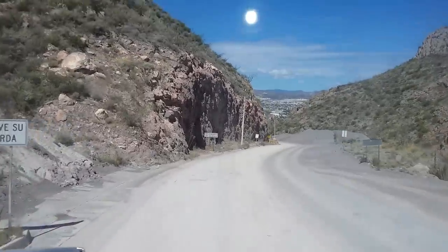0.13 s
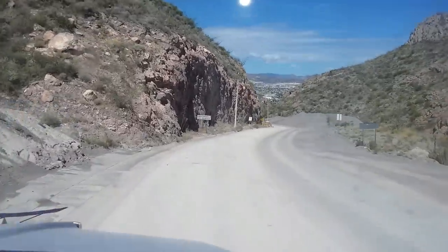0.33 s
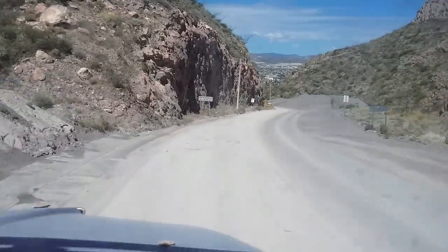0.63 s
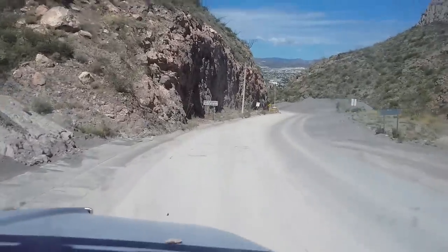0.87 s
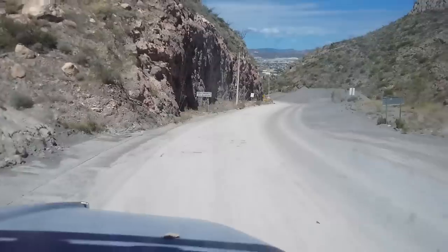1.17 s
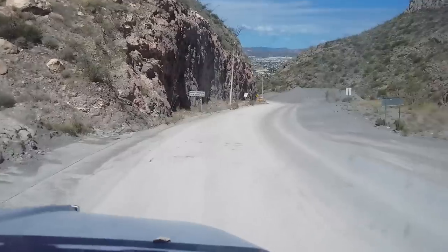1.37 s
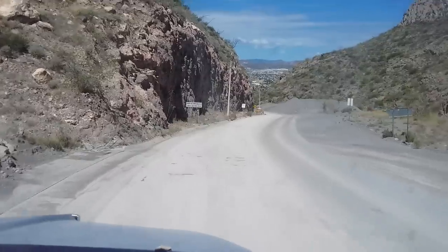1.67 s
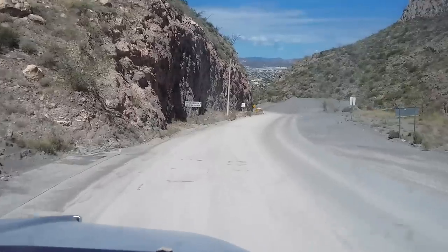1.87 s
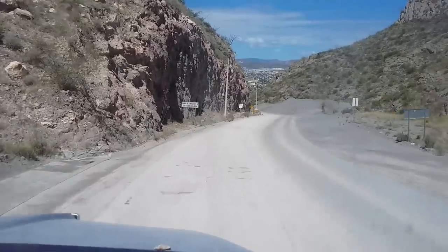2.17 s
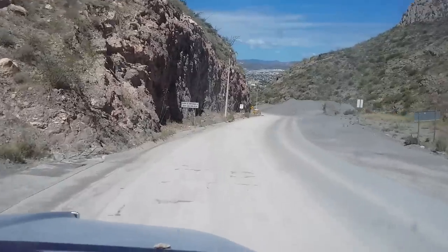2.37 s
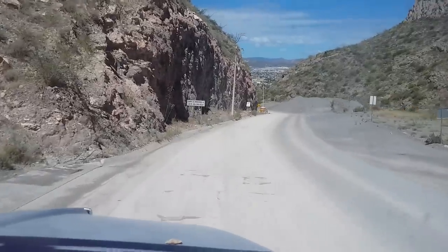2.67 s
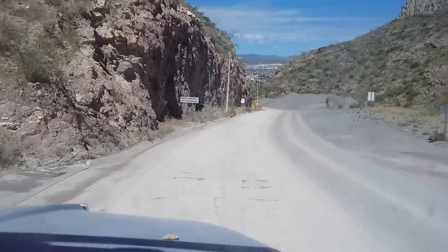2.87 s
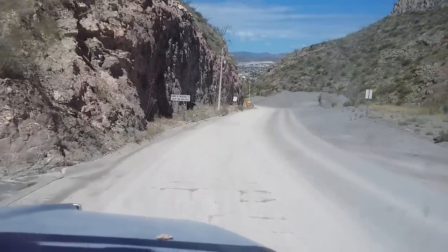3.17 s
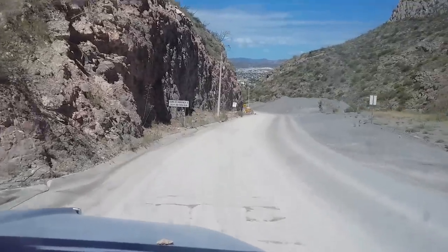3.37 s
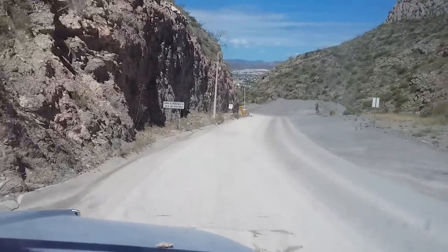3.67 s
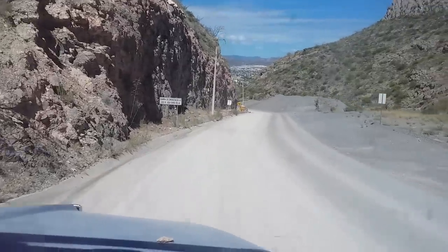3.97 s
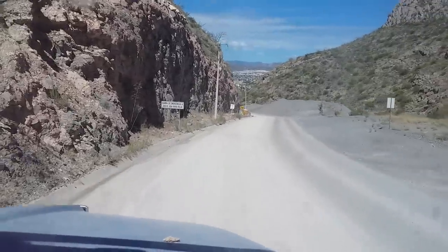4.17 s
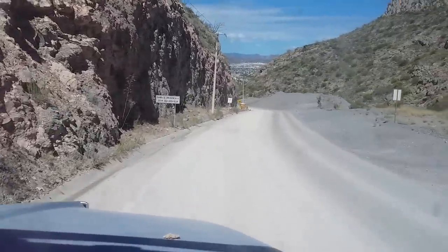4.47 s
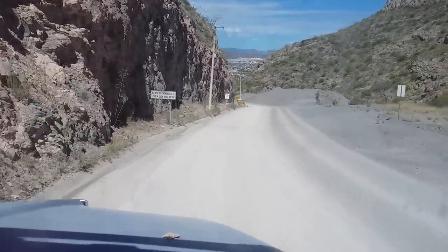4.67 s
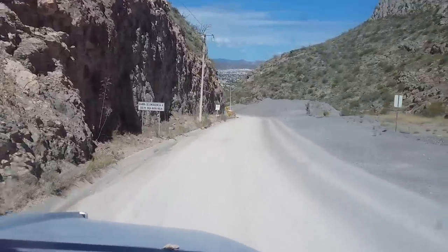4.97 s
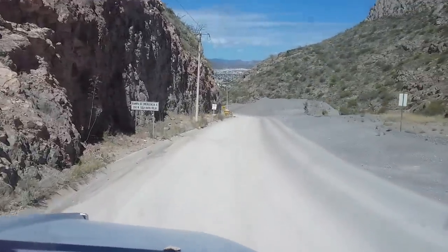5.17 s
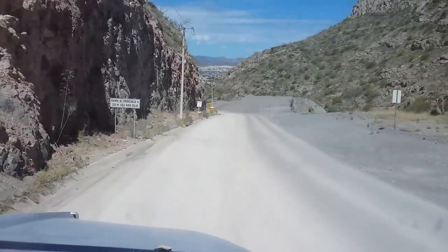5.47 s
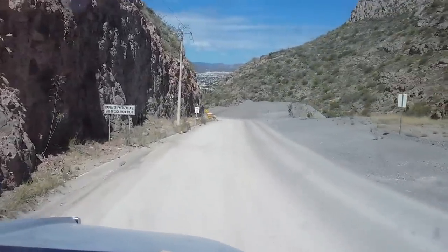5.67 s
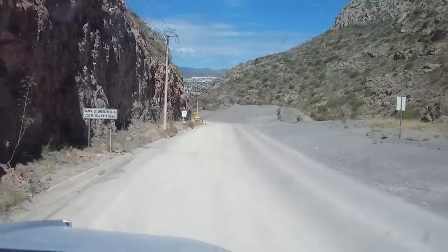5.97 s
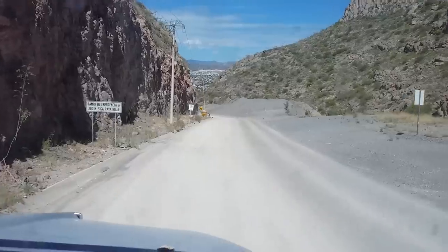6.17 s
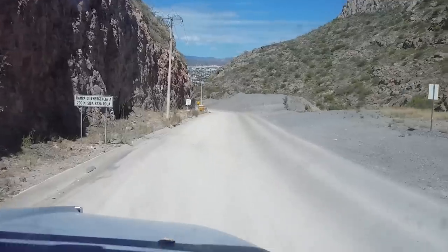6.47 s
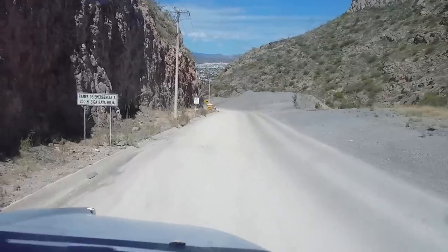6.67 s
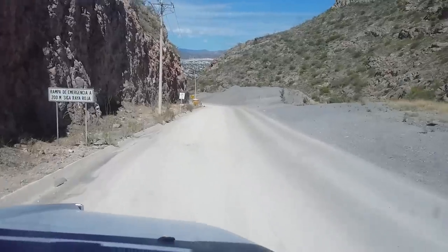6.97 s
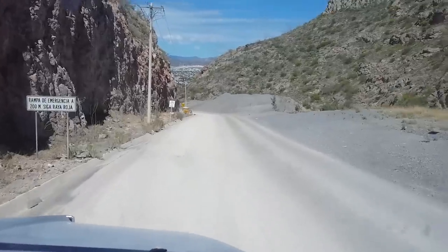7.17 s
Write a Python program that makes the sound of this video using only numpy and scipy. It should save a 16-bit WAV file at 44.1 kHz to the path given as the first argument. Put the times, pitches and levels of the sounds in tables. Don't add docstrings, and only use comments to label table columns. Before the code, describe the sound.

Heard from inside a heavy diesel truck's cab, the engine brake roars continuously: a deep, lumpy, rapid-fire bark with a raspy metallic edge. Pitch sags slightly within the first half second, climbs by about one second, then holds with small wavers. A loose part slaps early on. Valve clatter, gas hiss and buzzing trim sit beneath, over road rumble. Close, dense mono sound with little deep bass.

```python
import sys
import numpy as np
from scipy import signal
from scipy.fft import rfft, irfft, next_fast_len
from scipy.io import wavfile
from scipy.ndimage import uniform_filter1d, minimum_filter1d, map_coordinates

SR = 44100
rng = np.random.default_rng(int(sys.argv[2]) if len(sys.argv) > 2 else 0)


def elevation(decibels):
    levels = np.asarray(decibels, float)
    return 10 ** (levels / 20)


def waveform_to_disk(signal):
    frames = np.transpose(np.atleast_2d(signal))
    scaled = np.clip(frames, -1, 1) * 32767
    samples = np.round(scaled).astype(np.int16)
    wavfile.write(sys.argv[1], SR, samples)


N = 322371

CRUISE_RPM = 2000
CROSS_HZ = 893


def unit(x):
    return x / np.sqrt(np.mean(x ** 2) + 1e-20)


def filtered(x, response):
    m = next_fast_len(N + SR // 2)
    hz = np.fft.rfftfreq(m, 1 / SR)
    return irfft(rfft(x, m) * response(hz), m)[..., :N]


def coloured(x, points):
    f, db = np.transpose(points)
    return filtered(x, lambda hz: elevation(np.interp(np.log(hz + 1), np.log(f), db)))


def lag(hz, ms):
    return np.exp(-2j * np.pi * hz * ms / 1000)


def modes(table, f):
    return sum(g * 1j * f * w / (c * c - f * f + 1j * f * w) for c, w, g in table)


def ringing(x, rings):
    return filtered(x, lambda f: elevation(sum(db / (1 + (2 * (f - c) / w) ** 2) for c, w, db in rings)))


def noise():
    return rng.standard_normal(N)


def wobble(rate_hz):
    knots = rng.standard_normal(int(N * rate_hz / SR) + 4)
    return map_coordinates(knots, [np.arange(N) * rate_hz / SR])


# time in seconds, speed in rpm.
SPEED_TURNS = [(0.085, 1954.3), (0.475, 1832.2), (1.141, 2020.8), (1.509, 1997.6), (1.919, 2059.7),
               (2.283, 2003.7), (2.6, 2022.5), (3.031, 1986.2), (3.46, 1997.8), (3.888, 1969.8),
               (4.3, 1993.8), (4.657, 1987.6), (5.39, 2044.4), (5.951, 2058.0), (6.191, 2050.7),
               (6.607, 2017.0), (6.974, 2028.8), (7.196, 2017.3)]


def engine_rpm():
    s, rpm = np.transpose(SPEED_TURNS)
    rows = np.arange(len(s))
    place = np.interp(np.arange(N) / SR, s, rows)
    eased = np.floor(place) + np.sin(np.pi / 2 * (place % 1)) ** 2
    return np.interp(eased, rows, rpm)


def by_speed(cruise_db, db_per_100rpm):
    return cruise_db + db_per_100rpm * (engine_rpm() - CRUISE_RPM) / 100


def releases(jitter_ms, scatter_db, sag_db_per_100rpm, first_cycle):
    rpm = engine_rpm()
    cycle = np.cumsum(rpm) / (120 * SR)
    due = np.arange(140)[:, None] + first_cycle + np.arange(6) / 6
    at = np.interp(due, cycle, np.arange(N), right=N + 99)
    at = at + jitter_ms * SR / 1000 * rng.standard_normal(at.shape)
    rpm_then = rpm[np.clip(at, 0, N - 1).astype(int)]
    sag = np.clip(CRUISE_RPM - rpm_then, 0, None) / 100
    size = elevation((scatter_db + sag_db_per_100rpm * sag) * rng.standard_normal(at.shape))
    whole = at.astype(int)
    part = at - whole
    trains = np.zeros((6, 2 * N))
    for k in range(6):
        np.add.at(trains[k], whole[:, k], size[:, k] * (1 - part[:, k]))
        np.add.at(trains[k], whole[:, k] + 1, size[:, k] * part[:, k])
    return trains[:, :N]


# frequency in Hz, level in dB per Hz.
ROAD_SPECTRUM = [(13, -64.5), (22, -35), (187, -7.5), (245, -11.5), (294, -9), (575, -7), (670, -8),
                 (800, -21), (1560, -55.5), (2640, -120)]


def road():
    return elevation(-30.5 + wobble(5)) * unit(coloured(noise(), ROAD_SPECTRUM))


def turbo():
    song = lambda f: 1 / (1 + ((f - 9000) / 250) ** 2) + 0.35 / (1 + ((f - 9750) / 300) ** 2)
    return elevation(by_speed(-67.5, db_per_100rpm=-3)) * unit(filtered(noise(), song))


# start in seconds, peak in dB, t60 in seconds.
CAB_SLAPS = [
    (0.304, -28, 0.075),
    (.367, -36, .02),
    (.945, -33.5, .02),
]


def slaps():
    t = np.arange(N) / SR
    shape = sum(elevation(db - 60 * np.abs(t - s) / t60) * (t > s) for s, db, t60 in CAB_SLAPS)
    dull = unit(coloured(noise(), BLOCK_SPECTRUM))
    bright = unit(coloured(noise(), TRIM_SPECTRUM))
    return shape * (dull + elevation(-28.5) * bright)


# release knock in dB, seating lag in ms,
# seating knock in dB, hiss in dB, trim shake in dB.
VALVE_GEAR = [(0.5, 2.3, 1.5, 8, -11), (-0.5, 2.5, -1.5, 1.5, -14.5), (-1, 4.4, -1.5, -5, -7),
              (-1.5, 2.7, -3.5, -9.5, -13.5), (1, 1.7, -2.5, -2, -11.5), (-11.5, 2, -13, 2.5, -1)]


def bursts(trains, level_db, t60_s, late_ms=0):
    ms = np.array(RUNNERS)[:, 0] + late_ms
    hits = filtered(trains * elevation(level_db)[:, None], lambda f: lag(f, ms[:, None])).sum(0)
    return signal.lfilter([1], [1, -elevation(-60 / (t60_s * SR))], hits)


# frequency in Hz, level in dB per Hz.
TRIM_SPECTRUM = [(4120, -29.5), (7000, -4), (7890, -10), (8810, -0.5), (10300, -2.5), (11300, -2.5),
                 (12000, -3), (13800, -5), (15500, -8.5)]
# frequency in Hz, width in Hz, lift in dB.
PANEL_PEAKS = [(11200, 300, 3.4), (12700, 300, 3), (13800, 360, 6)]


def trim(trains):
    shake_db = np.transpose(VALVE_GEAR)[4]
    gate = .8 + unit(bursts(trains, shake_db, t60_s=.04)) * elevation(1.5 * wobble(30))
    return unit(ringing(coloured(gate * noise(), TRIM_SPECTRUM), PANEL_PEAKS))


def trim_level_db(wakes_s, waking_s, asleep_db):
    awake = np.clip((np.arange(N) / SR - wakes_s) / waking_s + .5, 0, 1)
    return awake * by_speed(-61.5, db_per_100rpm=7) + (1 - awake) * asleep_db


# lag in ms, level in dB.
ROCKER_TICKS = [(.5, -9), (.3, -4), (0.913, -7), (.5, -12), (.3, -3), (1.104, 2.5)]
# frequency in Hz, width in Hz, signed gain.
ROCKER_MODES = [(2370, 300, 0.8), (3420, 430, -.9), (4540, 850, 0.31), (6170, 750, -.08)]


def ticks(trains):
    where = lambda f: np.array([lag(f, ms) * elevation(db) for ms, db in ROCKER_TICKS])
    hits = filtered(trains * elevation(1.5 * wobble(60)), where).sum(0)
    band = lambda f: f ** 2 / (f ** 2 + 1800 ** 2) / (1 + (f / 7000) ** 8)
    return unit(filtered(hits, lambda f: modes(ROCKER_MODES, f) * band(f)))


# frequency in Hz, level in dB per Hz.
BLOCK_SPECTRUM = [(590, -24), (1000, -6.5), (1120, -4.5), (1180, -11.5), (1340, -7), (1570, -11.5),
                  (1700, -7.5), (2020, -6.5), (2350, -7.5), (2800, -18), (3200, -15), (4430, -18),
                  (8200, -38.5), (10700, -77.5), (18000, -120)]
# frequency in Hz, width in Hz, lift in dB.
BLOCK_PEAKS = [(2390, 220, 2.5), (3246, 150, 4.5), (4450, 200, 2.5), (5670, 540, 3)]


def clatter(trains):
    knock_db, seat_ms, seat_db, hiss_db, _ = np.transpose(VALVE_GEAR)
    t = np.arange(SR // 20) / SR
    paths = rng.standard_normal((7, len(t)))
    mirrored = paths[[0, 1, 2, 0, 1, 2]]
    own = paths[[3, 4, 5, 4, 5, 3]]
    rings = (mirrored + .8 * paths[6] + .35 * own) * elevation(-60 * t / .1)
    knocks = unit(signal.fftconvolve(trains * elevation(knock_db)[:, None], rings, axes=1).sum(0)[:N])
    dull_knocks = filtered(knocks, lambda f: 1 / (1 + (f / 5500) ** 2))
    hiss = unit(bursts(trains, hiss_db, t60_s=.025))
    seating = unit(bursts(trains, seat_db, t60_s=.0066, late_ms=seat_ms))
    gas = unit((3 + hiss + .25 * seating) * noise())
    return unit(ringing(coloured(elevation(1.5) * dull_knocks + gas, BLOCK_SPECTRUM), BLOCK_PEAKS))


# runner lag in ms, size,
# reflection lag in ms, signed reflection size.
PUFF_FRONTS = [(-0.21, 1.07, 3.9, -0.54), (-0.66, 2, 1.6, 0.12), (0.032, 1.9, 3.7, -0.34),
               (-0.34, 0.96, 2.7, 0.23), (-0.72, 1.7, 3.0, 0.34), (0.035, 1.76, 1.6, 0.26)]
# frequency in Hz, width in Hz, signed gain.
STACK_MODES = [(922.6, 54, -0.29), (1035, 18, -0.13), (1114, 56, 0.065), (1310, 20, 0.16),
               (1403, 160, 0.092), (1557, 23, -0.074), (1620, 29, 0.075), (1690, 220, -0.08),
               (1854, 30, 0.13), (1997, 33, -0.084), (2167, 80, 0.085), (2333, 47, 0.12),
               (2390, 380, -0.047), (2680, 21, 0.024)]


def rasp(trains):
    runner = lambda f: np.array([lag(f, ms) * (g + back * lag(f, back_ms))
                                 for ms, g, back_ms, back in PUFF_FRONTS])
    band = lambda f: (1 - 1 / (1 + (f / CROSS_HZ) ** 40)) / (1 + (f / 2800) ** 8)
    puffs = filtered(trains, runner).sum(0)
    return unit(filtered(puffs, lambda f: modes(STACK_MODES, f) * band(f)))


# runner lag in ms, release size,
# softness corner in Hz, reflection lag in ms, signed reflection size.
RUNNERS = [(-0.37, 1.39, 503, 8.04, 0.27), (-1.017, 1.94, 393, 8.6, 0.094), (-0.24, 1.97, 493, 7.59, -0.28),
           (-0.5, 1.005, 526, 2.7, -0.088), (-0.99, 2.06, 350, 16, 0.16), (-0.16, 1.76, 740, 6.45, 0.25)]
# frequency in Hz, width in Hz, gain (negative: opposite at the seat).
PIPE_MODES = [(126.4, 19.3, -1.59), (157.1, 21.1, -2.5), (168.2, 12.5, 1.22), (210.4, 10.7, 1.06),
              (293.9, 19, 0.91), (330.4, 7.9, 0.68), (318, 764, 0.64), (415.6, 13.8, 1.11),
              (501.7, 180, -0.89), (645.7, 65, -1.03), (830.6, 21.3, -0.51), (726, 44, -0.27),
              (1270, 270, 0.58), (1370, 1060, -0.52)]


def bark(trains):
    runner = lambda f: np.array([lag(f, ms) * (g / (1 + 1j * f / hz) + back * lag(f, back_ms))
                                 for ms, g, hz, back_ms, back in RUNNERS])
    cab = lambda f: 0.68 * modes([(57.6, 10.5, 0.71)], f) ** 2
    body = lambda f: (modes(PIPE_MODES, f) + cab(f)) / (1 + (f / CROSS_HZ) ** 40)
    puffs = filtered(trains, runner).sum(0)
    return unit(filtered(puffs, body))


def scene():
    trains = releases(jitter_ms=.01, scatter_db=.35, sag_db_per_100rpm=.7, first_cycle=.061)
    shake_db = .35 * wobble(4) + 0.83 * wobble(11)
    exhaust = elevation(by_speed(-10.9, db_per_100rpm=.3)) * bark(trains)
    exhaust = exhaust + elevation(by_speed(-30, db_per_100rpm=.58) + 0.92 * wobble(9)) * rasp(trains)
    knocking = clatter(trains) + elevation(-15) * ticks(trains)
    gear = elevation(by_speed(-32, db_per_100rpm=1.5) + shake_db) * knocking
    trim_db = trim_level_db(wakes_s=.85, waking_s=.3, asleep_db=-70.5)
    panels = elevation(trim_db + .8 * shake_db) * trim(trains)
    return (exhaust + gear + panels + turbo() + slaps() + road())[None]


def top_cut(x):
    return signal.sosfilt(signal.butter(12, 15670, fs=SR, output="sos"), x)


def record(dry):
    need = np.minimum(1, .94 / (np.abs(dry) + 1e-9))
    gain = uniform_filter1d(minimum_filter1d(need, size=601), size=600)
    mic = filtered(dry * gain, lambda f: 1 - 1 / (1 + (f / 40) ** 4))
    return top_cut(mic)


dry = scene()
out = record(dry)
waveform_to_disk(out)
```